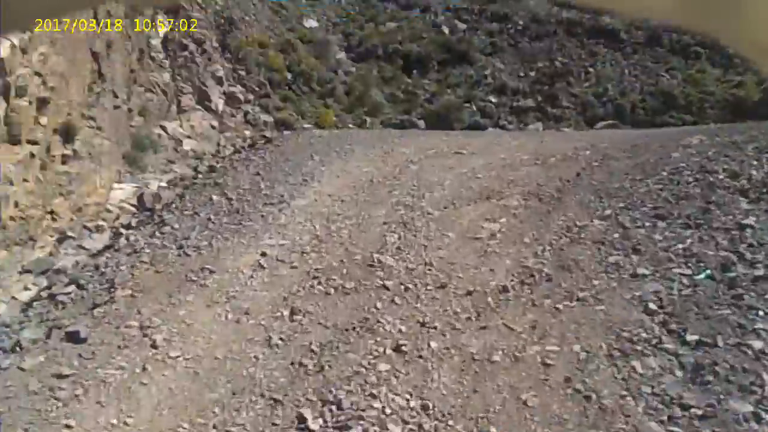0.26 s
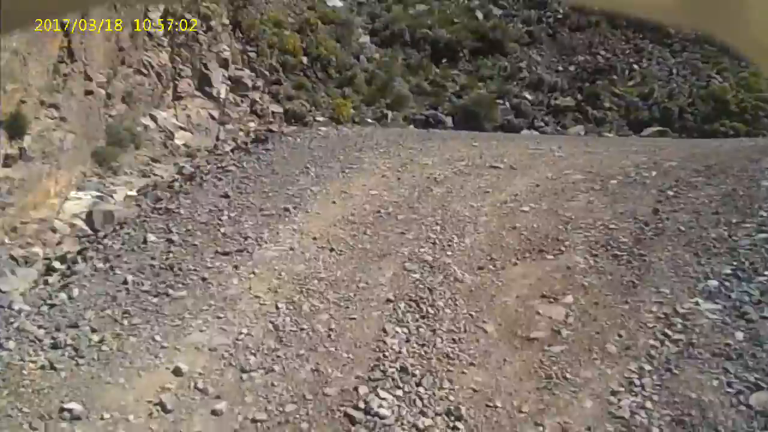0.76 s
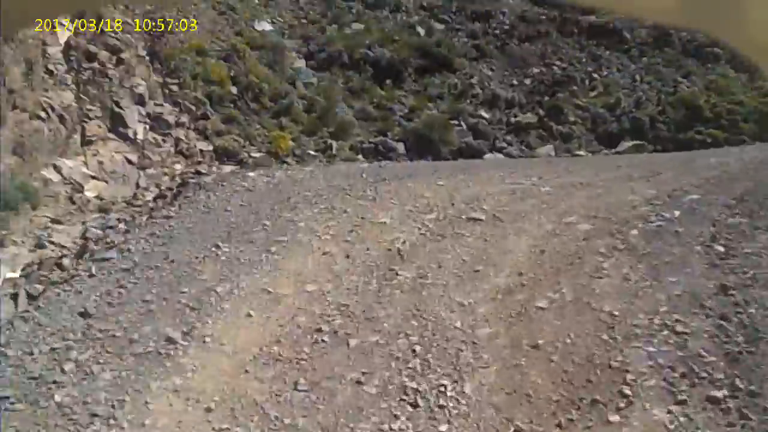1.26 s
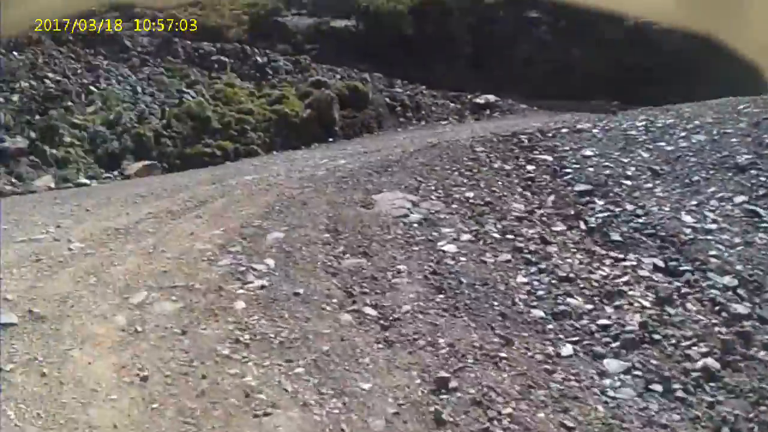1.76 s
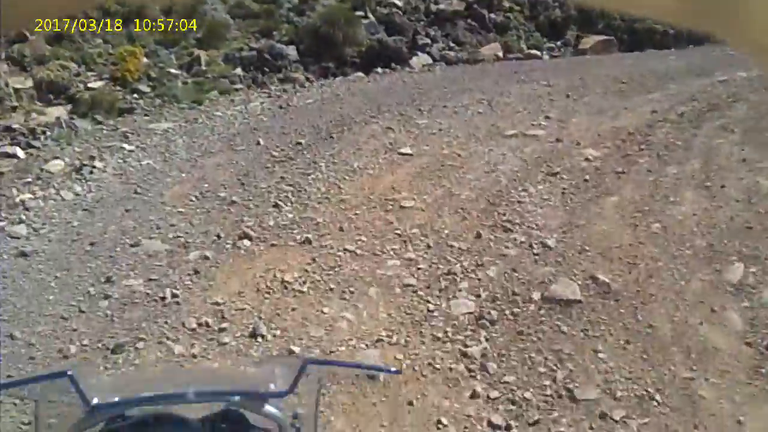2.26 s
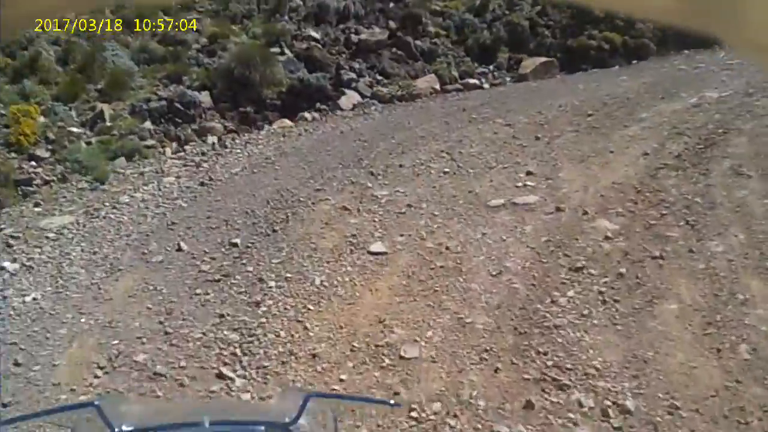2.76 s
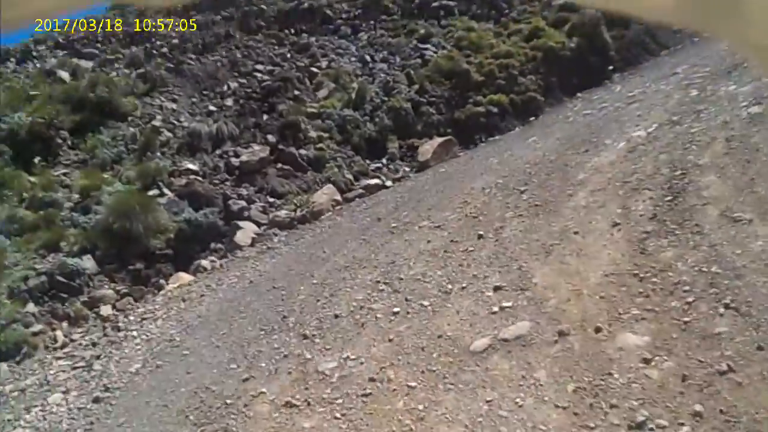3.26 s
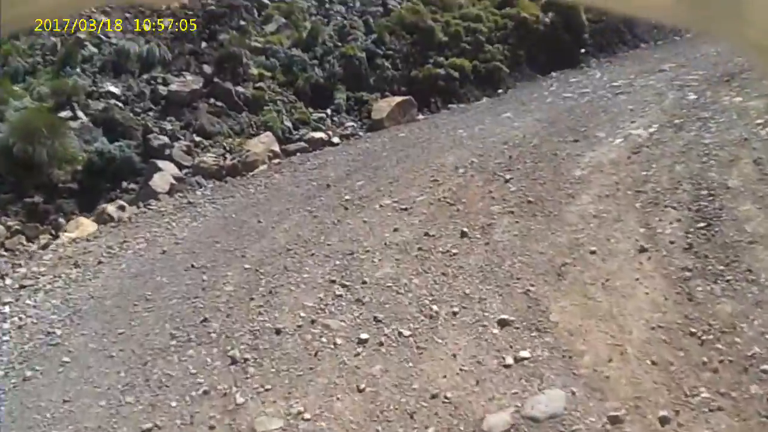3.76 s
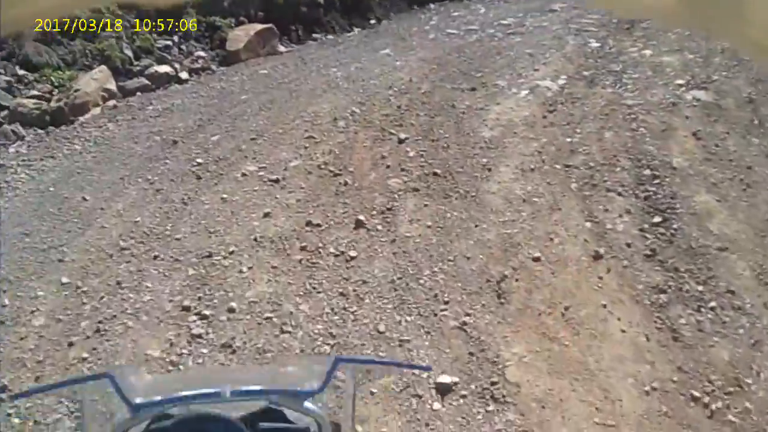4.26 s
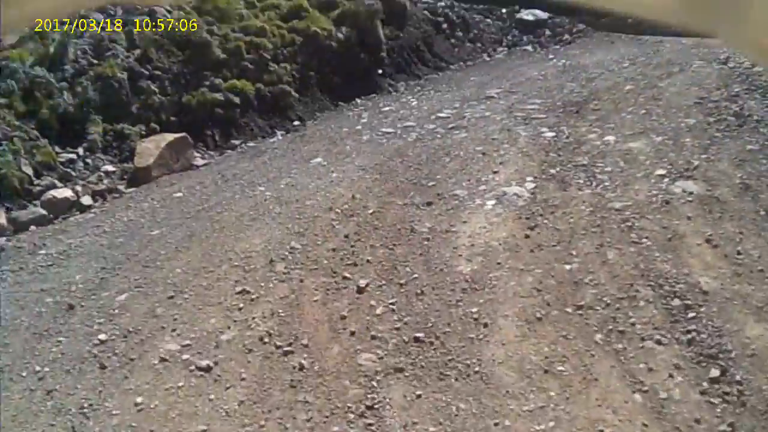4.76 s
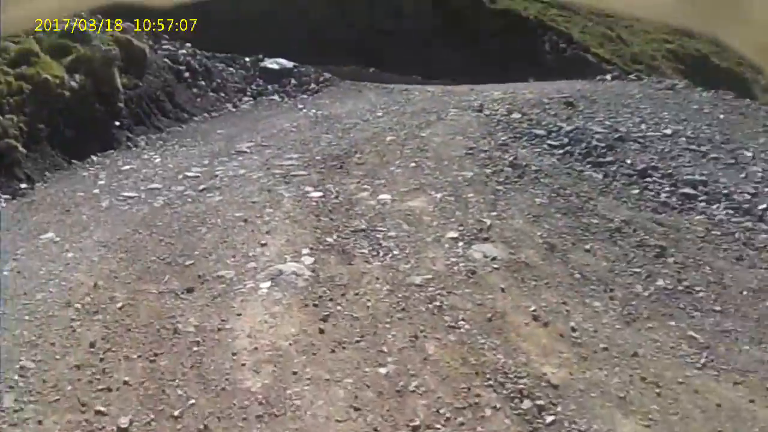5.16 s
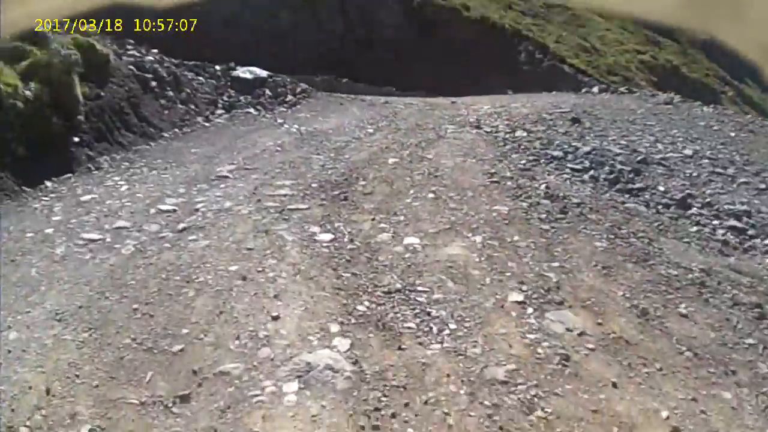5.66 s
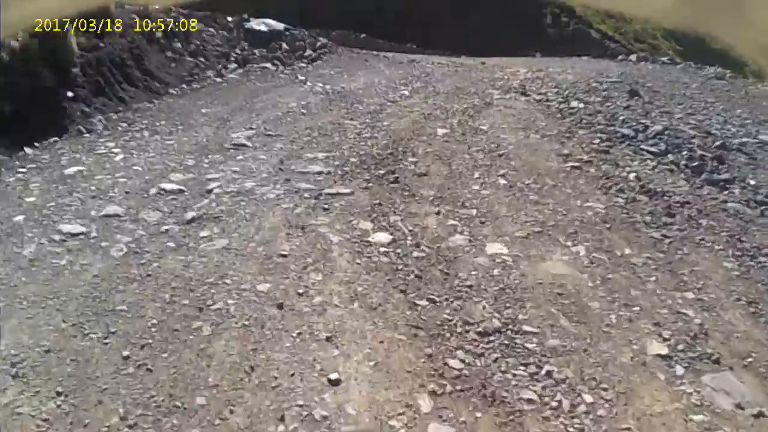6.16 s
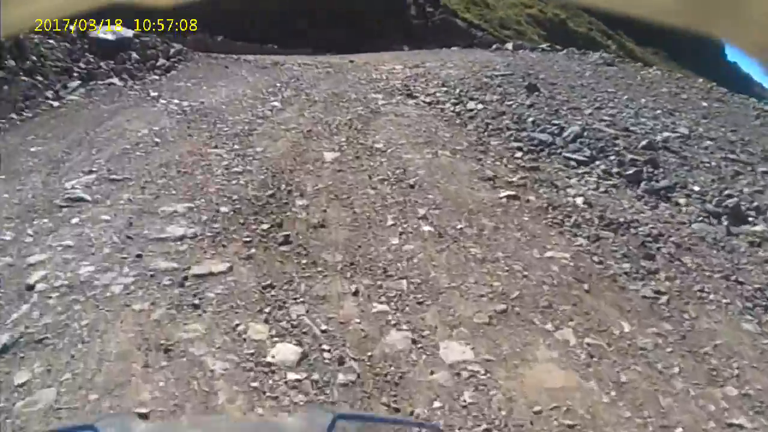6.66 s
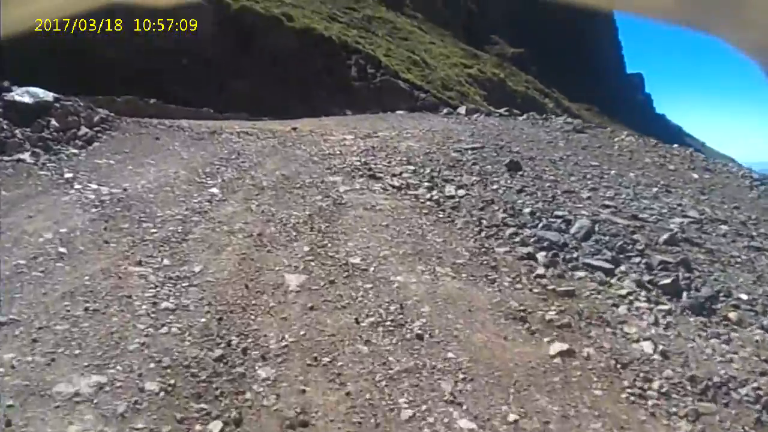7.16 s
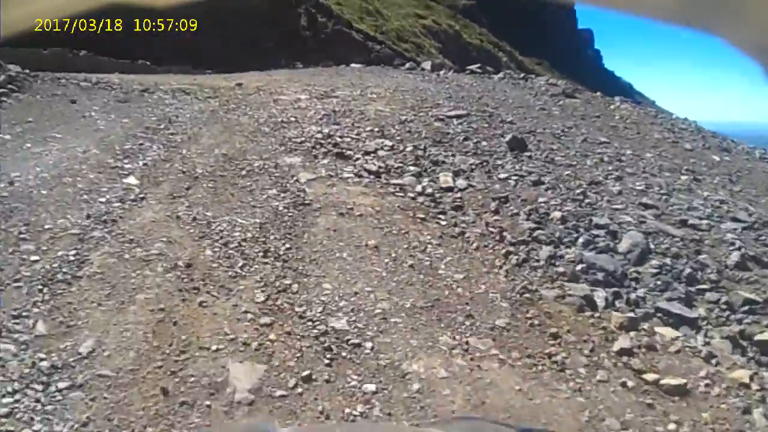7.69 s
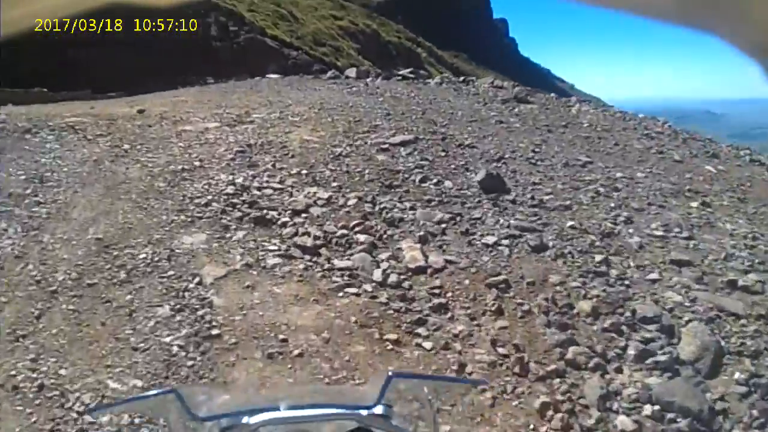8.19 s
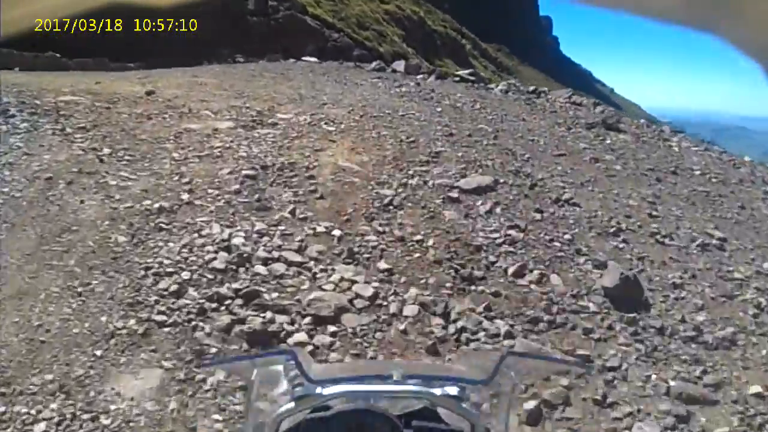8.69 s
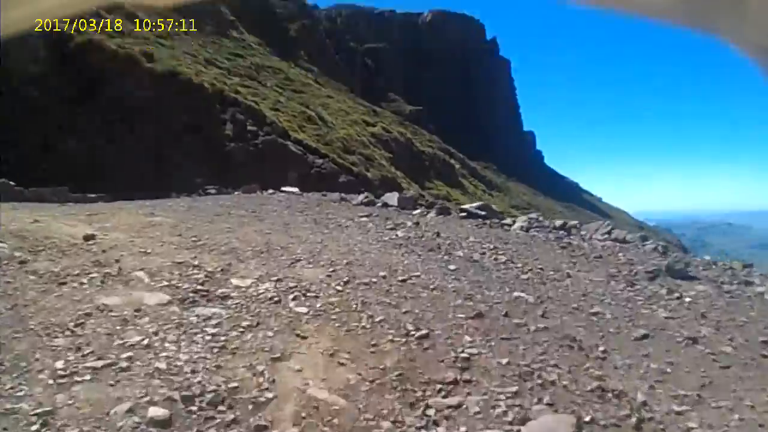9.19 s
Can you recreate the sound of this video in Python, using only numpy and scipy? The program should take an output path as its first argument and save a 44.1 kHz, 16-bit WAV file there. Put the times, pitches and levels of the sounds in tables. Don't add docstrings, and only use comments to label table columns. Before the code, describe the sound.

Muffled, hollow rattle of a motorcycle labouring over loose gravel, its thumping engine surging and easing while stones click and knock.

```python
import sys
import numpy as np
from scipy import signal
from scipy.fft import rfft, irfft, next_fast_len
from scipy.io import wavfile
from scipy.ndimage import uniform_filter1d

SR = 44100
rng = np.random.default_rng(int(sys.argv[2]) if len(sys.argv) > 2 else 0)


def attenuation_scalar(level_db):
    decades = np.asarray(level_db, float) / 20
    return 10 ** decades


def output_pcm(signal):
    pcm = np.clip(np.atleast_2d(signal).T, -1, 1) * 32767
    wavfile.write(sys.argv[1], SR, np.round(pcm).astype(np.int16))


N = 415863
t = np.arange(N) / SR

# start_s, firings_per_s
SPEED = [(0.0, 27.74), (0.38, 39.76), (0.91, 35.44), (1.26, 40.1), (1.8, 26.47), (2.53, 22.45),
         (2.63, 27.08), (4.1, 20.24), (4.4, 21.84), (6.05, 20.0), (6.15, 26.6), (6.72, 23.9), (7.33, 24.21),
         (8.12, 29.69), (8.34, 36.45), (8.74, 31.35), (8.96, 39.73), (9.43, 32.96)]
# start_s, level_db, most_shaken_hz
CLATTER = [(0.0, -43, 1240), (0.24, -41, 1407), (1.13, -39.5, 1290), (1.42, -40.5, 1120), (1.53, -44, 1310),
           (2.2, -49, 1264), (2.8, -42, 1256), (3.0, -46.5, 1270), (3.9, -49, 1265), (4.7, -46.5, 1244),
           (5.3, -46.5, 1294), (5.9, -46.5, 1160), (6.15, -42, 1263), (7.3, -45.5, 1200),
           (7.75, -41.5, 1123), (8.35, -40, 1360), (8.7, -41.5, 1303), (9.43, -40, 1330)]
# freq_hz, density_db
BODY = [(250, -68.5), (340, -15.5), (500, -3), (630, -6.5), (660, -3.5), (900, 0.5), (1030, 0),
        (1150, -22.5), (1600, -94.5)]
# freq_hz, density_db
CAVITY = [(800, -89), (980, -29), (1020, -15), (1050, -2), (1180, 0.5), (1300, 2), (1460, -1), (1520, -4),
          (1700, -10), (1770, -32), (1900, -37), (2400, -92)]
# freq_hz, density_db
PANEL = [(1300, -96), (1720, -0.5), (2050, -3), (2500, -2.5), (2850, -2.5), (3000, -9), (3200, -9.5),
         (3500, -20.5), (3900, -22), (5300, -46), (5900, -60.5), (6650, -48.5), (7400, -57), (9000, -90.5)]
# freq_hz, width_hz, level_db
PANEL_MODES = [(1877, 74, 2.5), (2196, 55, 0.5), (2658, 35, 0.5)]


def evened(x):
    return x / np.sqrt(np.mean(x ** 2) + 1e-20)


def columns(rows):
    s, *values = np.transpose(rows)
    return [np.interp(t, s, v) for v in values]


def humps(rows, half_s=None):
    return sum(row[1] * np.exp(-((t - row[0]) / (half_s or row[2])) ** 2) for row in rows)


def colour(points, modes=(), size=4096):
    hz, db = np.transpose(points)
    grid_hz = abs(np.fft.fftfreq(size, 1 / SR))
    power = attenuation_scalar(2 * np.interp(np.log(grid_hz + 1), np.log(hz + 1), np.maximum(db, -90)))
    for mode_hz, width_hz, mode_db in modes:
        power = power + attenuation_scalar(2 * mode_db) / (1 + (2 * (grid_hz - mode_hz) / width_hz) ** 2) ** 2
    spectrum = np.exp(np.conj(signal.hilbert(np.log(power) / 2)))
    taps = np.fft.ifft(spectrum).real[:size // 2]
    return taps / np.linalg.norm(taps)


def through(x, taps):
    return signal.oaconvolve(np.concatenate([x[-len(taps):], x]), taps)[len(taps):len(taps) + N]


def ring(x, hz, width_hz):
    r = np.exp(-np.pi * width_hz / SR)
    return 2 * signal.lfilter([1 - r], [1, -r * np.exp(2j * np.pi * hz / SR)], x).real


def drift(hz):
    size = next_fast_len(N)
    lowpass = 1 / (1 + (np.fft.rfftfreq(size, 1 / SR) / hz) ** 4)
    return evened(irfft(rfft(rng.standard_normal(size)) * lowpass, size)[:N])


def add(mix, s, sound):
    part = mix[round(s * SR):][:len(sound)]
    part += sound[:len(part)]


def peaked(x):
    return x / abs(x).max()


def crank():
    # centre_s, firings_gained
    slip_events = [(0.1, 0.15), (0.31, 0.08), (0.46, 0.08), (0.59, -0.13), (0.74, 0.19), (1.21, 0.09),
                   (1.37, -0.16), (1.71, -0.21), (2.64, -0.08), (2.85, 0.21), (3.15, -0.26), (3.29, 0.11),
                   (4.4, -0.12), (4.65, 0.16), (4.88, 0.13), (5.1, -0.13), (5.58, -0.08), (5.92, -0.08),
                   (6.3, 0.09), (6.48, -0.12), (6.68, 0.08), (6.95, -0.21), (7.11, 0.24), (7.88, 0.14),
                   (8.29, 0.07), (8.65, -0.1), (8.78, 0.13), (8.97, 0.1), (9.1, -0.12), (9.23, 0.1)]
    start_turn, slip_s = -.08, .06
    hunt_turns, hunt_hz = .016, 8
    turns = start_turn + np.cumsum(columns(SPEED)[0]) / SR
    return turns + humps(slip_events, slip_s) + hunt_turns * drift(hunt_hz)


def effort(share=1):
    # start_s, firing_level_db
    open_throttle = [(0.0, -58), (0.63, -54.5), (0.8, -56), (1.4, -55.5), (2.5, -62), (2.75, -57),
                     (3.25, -59.5), (3.45, -63.5), (4.1, -63.5), (4.7, -62), (5.9, -66.5), (6.14, -58),
                     (6.5, -57), (6.88, -62), (7.01, -60), (7.46, -59.5), (8.3, -54), (9.43, -56)]
    # start_s, length_s, depth_db
    lift_events = [
        (1.43, 1, 21),
        (2.832, 0.18, 21),
        (3.288, 0.045, 7),
        (3.566, .44, 21.5),
        (4.2, .12, 11),
        (4.457, 0.14, 14),
        (5.39, 0.12, 8),
        (7.055, 0.2, 5),
        (8.99, 0.043, 9.5),
    ]
    shut_s, open_s = 0.06, 0.025
    level_db = columns(open_throttle)[0]
    for s, length_s, depth_db in lift_events:
        closing = np.clip((t - s) / shut_s, 0, 1)
        opening = np.clip((s + length_s - t) / open_s + 1, 0, 1)
        level_db = level_db - share * depth_db * closing * opening
    return level_db


def exhaust(turns):
    # freq_hz, level_db, swell_s, delay_s, sign
    exhaust_modes = [(263, 0, .0030, -.0039, 1), (92, -7, .0055, -.0027, -1), (182, -19, .0075, -.0054, 1),
                     (63, -23, .0094, .0048, 1), (345, -13, .0025, -.0045, -1)]
    pumping, thump_db = 0.44, 1
    pipe_rise, pipe_spread = .22, .02
    lead = 400
    at = np.flatnonzero(np.diff(np.floor(turns)))
    burn = rng.standard_normal((len(at), 2 + len(exhaust_modes)))
    u, rate = np.arange(2400) / SR, columns(SPEED)[0][at]
    effort_db = effort()[at]
    out = np.zeros(N + 4000)
    throttle = attenuation_scalar(effort_db + 0.4 * burn[:, 0]) / np.sqrt(rate / 30)
    slow = (rate / 27) ** -.6
    slow = slow * attenuation_scalar(thump_db + effort(pumping)[at] - effort_db)
    heat = (rate / 30) ** pipe_rise * (1 + pipe_spread * burn[:, 1])
    for (hz, db, swell_s, delay_s, sign), chance in zip(exhaust_modes, burn.T[2:]):
        if hz < 120:
            size, tune = throttle * slow * attenuation_scalar(0.7 * chance), 1
        else:
            size, tune = throttle * attenuation_scalar(1.5 * chance), heat[:, None]
        envelope = u / swell_s * np.exp(1 - u / swell_s)
        pulses = envelope * np.sin(2 * np.pi * hz * u * tune)
        places = (at + lead + round(delay_s * SR))[:, None] + np.arange(len(u))
        np.add.at(out, places, sign * attenuation_scalar(db) * size[:, None] * pulses)
    return attenuation_scalar(8.5) * out[lead:N + lead]


def clatter(turns):
    # centre_s, change_db
    bump_events = [(0.3, 1), (0.52, 1.5), (1.75, -1.5), (2.07, -1), (2.36, -3.5), (3.23, 4.5), (3.46, 3),
                   (3.6, 4), (4.2, 4.5), (4.32, -1), (4.41, 2.5), (4.8, 3), (5.15, 2.5), (5.47, 2.5),
                   (5.7, 1), (6.56, 1), (6.68, -1.5), (7.03, 2), (7.58, 2), (7.98, -1.5), (8.06, 2.5),
                   (8.12, -2.5), (8.2, 1), (8.4, 1), (8.51, 2.5), (8.57, -2), (8.98, 2.5), (9.06, -2.5),
                   (9.2, 3)]
    # centre_s, swell_db, half_length_s
    frame_swells = [(0.1, -1, 0.1), (0.65, 13.5, 0.13), (1.0, 8.5, 0.21), (1.27, 5.5, 0.074),
                    (1.68, -9, 0.09), (1.99, 10, 0.096), (2.3, 10.5, 0.25), (2.73, 12, 0.096),
                    (3.24, 12, 0.093), (3.7, 10, 0.28), (4.04, 14, 0.086), (4.38, 11, 0.11),
                    (4.75, 10, 0.14), (5.25, 7, 0.13), (6.2, 5.5, 0.12), (6.48, 7, 0.071), (7.03, 9, 0.043),
                    (8.2, 3, .1), (8.5, 8.5, 0.25), (8.95, 15.5, 0.04), (9.17, 14.5, 0.11)]
    valve_turn, tappet_turn = .66, .56
    body_db, body_bump, body_follow = -13.5, 0.34, .85
    walls_db, walls_bump = -9, 0.97
    frame_db, frame_hz = -29, 457

    def shake(db, hz=27):
        return attenuation_scalar(db * drift(hz))

    level_db, seat_hz = columns(CLATTER)
    bump_db, swell_db = humps(bump_events, 0.051), humps(frame_swells)
    valves_db = 0.8 * np.cos(2 * np.pi * (turns - valve_turn))
    tappet_db = 2.2 * np.cos(np.pi * (turns - tappet_turn)) ** 6
    clicks = attenuation_scalar(4.7 * np.minimum(rng.exponential(1, N), 5))
    clicks = clicks * (rng.random(N) < 1500 / SR) * rng.choice([-1, 1], N)
    drive = 0.92 * rng.standard_normal(N) + 0.3 * evened(clicks)
    drive = drive * attenuation_scalar(valves_db) * shake(0.72)

    cavity = attenuation_scalar(bump_db) * evened(through(drive * shake(0.91), colour(CAVITY)))
    lean = np.clip((seat_hz - 1270) / 250, -.8, .8)
    cavity = cavity + lean * (ring(cavity, 1300, 230) - ring(cavity, 1100, 200))

    body_db = body_db + (body_follow - 1) * (level_db + 44) + body_bump * bump_db
    body = attenuation_scalar(body_db) * evened(through(drive * shake(2.1), colour(BODY)))
    rattle = through(drive * attenuation_scalar(tappet_db) * shake(1.0), colour(PANEL, PANEL_MODES))
    walls = attenuation_scalar(walls_db + walls_bump * bump_db) * evened(rattle)

    frame = evened(ring(ring(drive * shake(0.92, 2.2), frame_hz, 16), frame_hz, 36))
    second_tube = evened(ring(ring(drive, 650, 14), 650, 40))
    frame = frame + attenuation_scalar(-7.0 - .5 * swell_db) * second_tube
    return attenuation_scalar(level_db - 0.84) * (cavity + body + walls + attenuation_scalar(frame_db + swell_db) * frame)


def burst(decay_s, rise_s):
    u = np.arange(6000) / SR
    lumps_db = 2.6 * evened(uniform_filter1d(rng.standard_normal(len(u)), 120))
    grit = rng.standard_normal(len(u)) * attenuation_scalar(lumps_db)
    return grit * (1 - np.exp(-u / rise_s)) * attenuation_scalar(-60 * u / decay_s)


def stones():
    # start_s, peak_db, ring_hz
    stone_hits = [(0.2648, -31, 1390), (0.3304, -25.5, 1330), (0.375, -28.5, 1486), (0.664, -29.5, 1110),
                  (1.1082, -26, 1320), (1.3803, -25.5, 1285), (2.9264, -38, 1210), (3.138, -33, 1150),
                  (3.1994, -40, 1440), (3.282, -33, 1260), (3.4488, -32, 1293), (3.479, -33, 1290),
                  (3.8438, -36.5, 1184), (4.3896, -25.5, 1270), (4.7827, -33, 1220), (5.297, -30, 1305),
                  (5.3538, -34, 1225), (5.9394, -31.5, 1470), (6.1001, -23.5, 1170), (6.3527, -29, 1320),
                  (7.7356, -30, 1120), (8.41, -20.5, 1353), (8.4454, -27, 1376), (8.5004, -29, 1300),
                  (8.9204, -26.5, 1415), (9.1042, -28.5, 1300), (9.1283, -24.5, 1360), (9.183, -29, 1300),
                  (9.2743, -27, 1255), (9.38, -29, 1300)]
    # start_s, peak_db, brightness_db
    spray_hits = [(1.07, -34, -32), (1.1216, -32.5, -25), (1.173, -33.5, -25), (1.2463, -32, -27.5),
                  (1.3813, -34, -28), (1.5832, -33.5, -29), (2.102, -44, -32), (2.152, -35.5, -32),
                  (3.1565, -37, -28), (3.2014, -29, -20.5), (3.2201, -28.5, -27.5), (3.4486, -28.5, -31),
                  (3.579, -41, -28), (4.3935, -33.5, -27), (4.4035, -34, -20), (5.1627, -33, -31),
                  (6.084, -36, -26), (6.4356, -35.5, -21), (7.261, -43, -22), (8.411, -29.5, -21),
                  (8.903, -37.5, -27), (9.1286, -32, -26)]
    stone_s, spray_s = 0.036, .078
    out, u = np.zeros(N), np.arange(4000) / SR
    swell = (1 - np.exp(-u / 0.00083)) ** 2 * attenuation_scalar(-60 * u / stone_s)
    for s, db, hz in stone_hits:
        partner_hz = hz * rng.uniform(0.72, 1.2)
        pair = np.sin(2 * np.pi * hz * u) + 0.3 * np.sin(2 * np.pi * (partner_hz * u + rng.random()))
        add(out, s - .0014, attenuation_scalar(db - 4.5) * peaked(swell * pair))

    ways = [colour(CAVITY), colour(BODY), colour(PANEL, PANEL_MODES)]
    ways.append(np.diff(np.diff(ways[2]) * np.exp(-np.arange(2047) / 300)))
    for s, db, bright_db in spray_hits:
        blow = burst(spray_s, rise_s=0.00072)
        for way, share_db in zip(ways, (-3.0, -18, -3.5, bright_db + 2.0)):
            add(out, s - .002, attenuation_scalar(db + share_db) * peaked(signal.fftconvolve(blow, way)))
    return out


def knocks():
    # start_s, peak_db
    knock_hits = [
        (0.199, -43),
        (0.435, -33),
        (0.952, -34),
        (2.3727, -35),
        (5.053, -44),
        (6.572, -31),
        (7.484, -40),
        (7.677, -32.5),
        (9.029, -43.5),
    ]
    # freq_hz, level_db
    hollow_modes = [(650, -19.5), (770, 1), (900, 2), (1050, -1.5), (1210, 8.5)]
    knock_s = 0.032
    out, u = np.zeros(N), np.arange(5000) / SR
    for s, db in knock_hits:
        rings = 0
        for hz, mode_db in hollow_modes:
            rings = rings + attenuation_scalar(mode_db) * np.sin(2 * np.pi * hz * rng.uniform(1.0, 1.04) * u)
        rise = (1 - np.exp(-u / 0.0011)) ** 2
        add(out, s - .0012, attenuation_scalar(db - 1.0 - 60 * u / knock_s) * rise * rings)
    return out


def rumble(turns):
    # freq_hz, density_db
    rumble_spectrum = [(12, -28.5), (20, -7), (97, -9), (145, -12), (162, -8), (222, -13.5), (304, -7.5),
                       (353, -17.5), (400, -6.5), (520, -29.5), (880, -120)]
    rumble_db = -70
    level_db = columns(CLATTER)[0]
    lumps = rng.standard_normal(N) * attenuation_scalar(1.5 * drift(14))
    low = evened(through(lumps, colour(rumble_spectrum, size=16384)))
    piston = np.sin(2 * np.pi * turns) + 0.74 * np.cos(4 * np.pi * turns - np.pi / 6)
    piston = attenuation_scalar(-76.5 + .25 * (effort() + 59.0)) * piston
    return attenuation_scalar(rumble_db - 0.7 + 0.43 * (level_db + 51)) * low + piston


def hiss_and_whine():
    # freq_hz, density_db
    hiss_spectrum = [(3000, -4), (4600, 7), (5400, -2.5), (6000, -21.5), (8000, -17.5), (9000, -7.5),
                     (10000, -1), (11500, 0.5), (14000, -0.5), (15700, -5)]
    # freq_hz, level_db
    whine_lines = [(15176, -114), (15272, -111), (15364, -103), (15461, -102), (15558, -111), (15649, -116)]
    hiss_db = -85
    hiss = attenuation_scalar(hiss_db) * signal.oaconvolve(rng.standard_normal(N), colour(hiss_spectrum))[:N]
    wander = np.cumsum(4.0 * drift(1.5)) / SR
    whine = sum(attenuation_scalar(db + 3) * np.sin(2 * np.pi * (hz * t + wander + rng.random())) for hz, db in whine_lines)
    return hiss + whine


def scene():
    turns = crank()
    return (exhaust(turns) + clatter(turns) + stones() + knocks() + rumble(turns))[None]


def roll_off(x):
    return signal.sosfilt(signal.butter(12, 15730, fs=SR, output="sos"), x)


def record(dry):
    return roll_off(dry + hiss_and_whine())


dry = scene()
out = record(dry)
output_pcm(out)
```